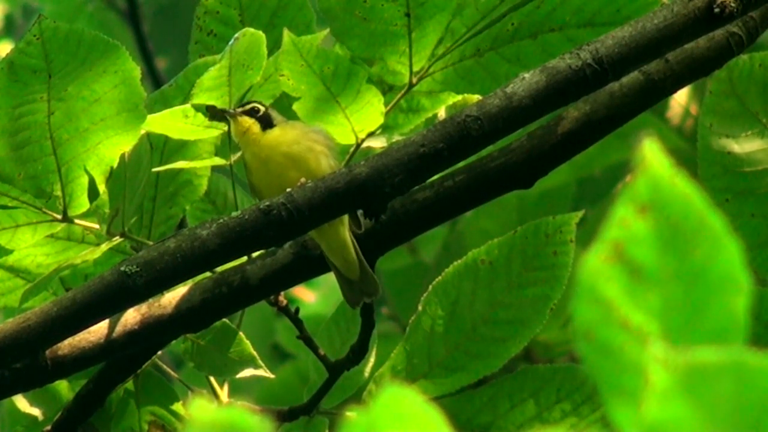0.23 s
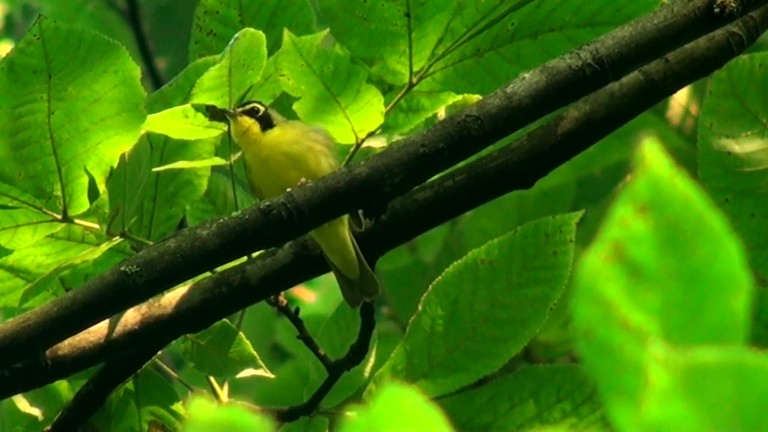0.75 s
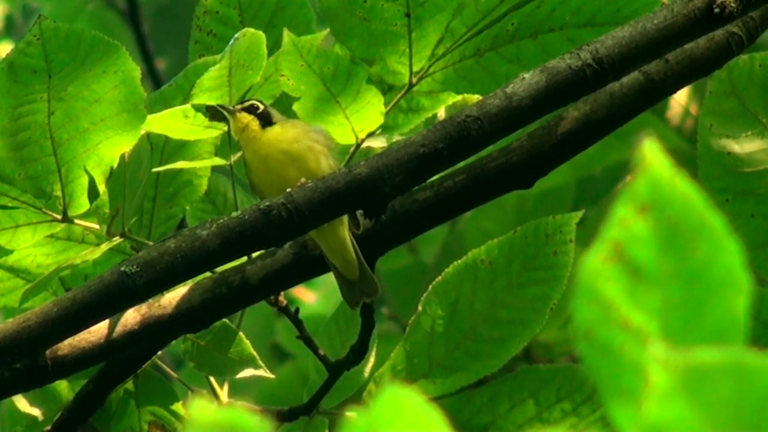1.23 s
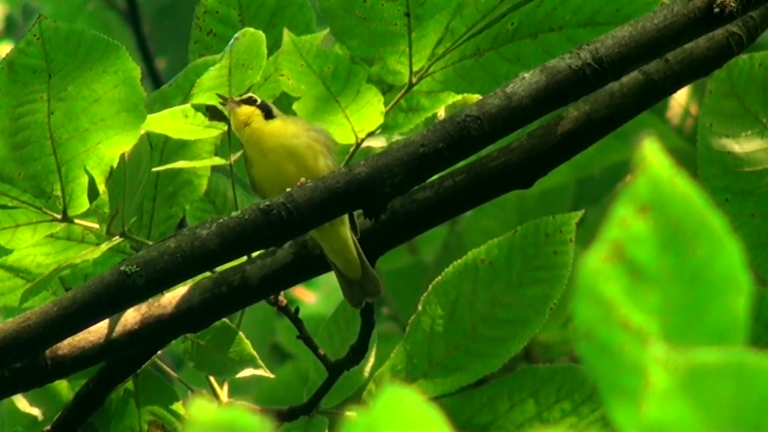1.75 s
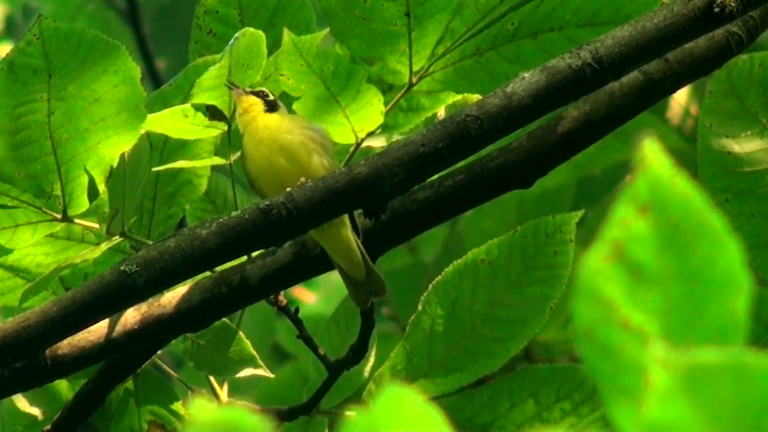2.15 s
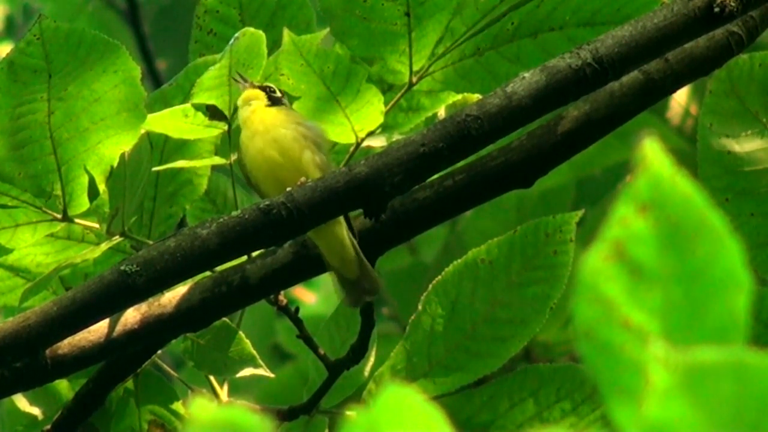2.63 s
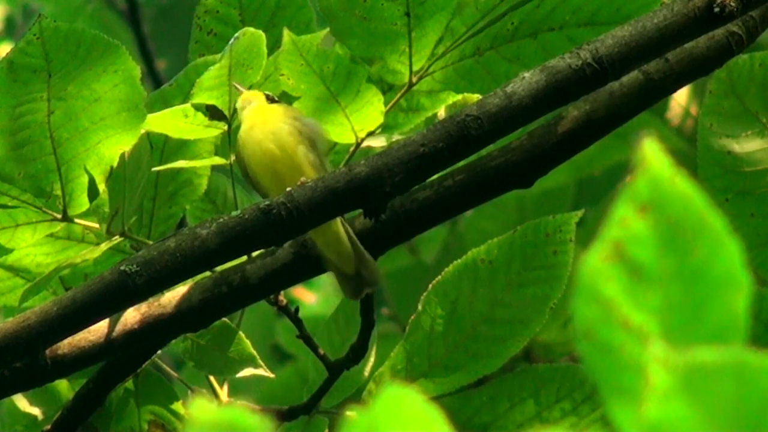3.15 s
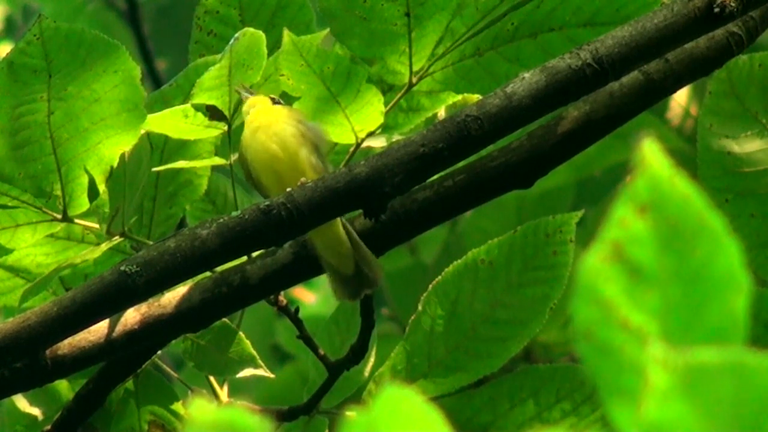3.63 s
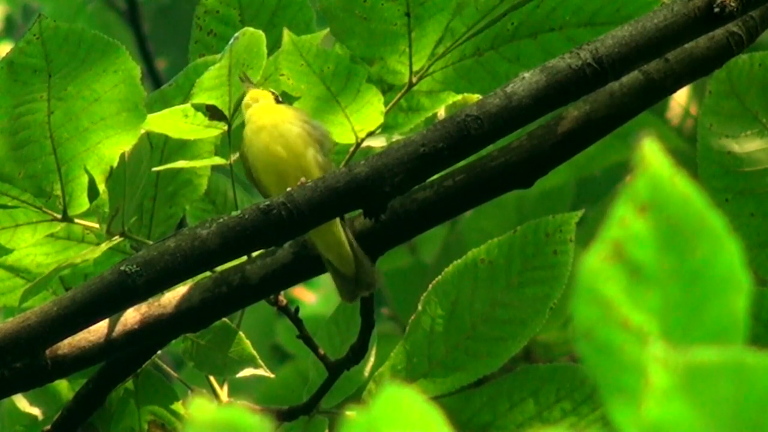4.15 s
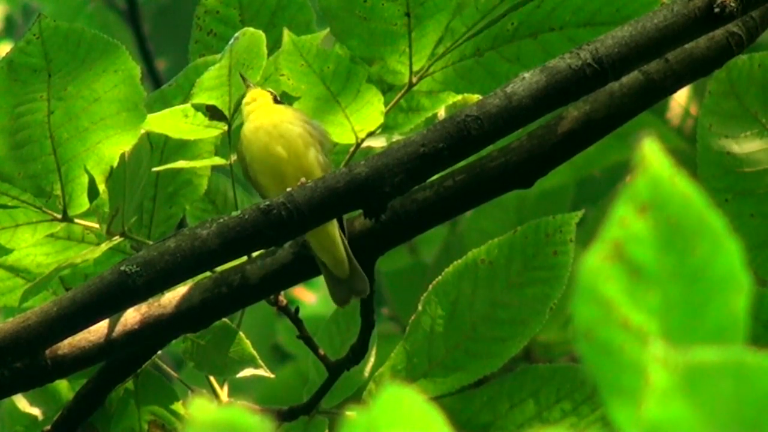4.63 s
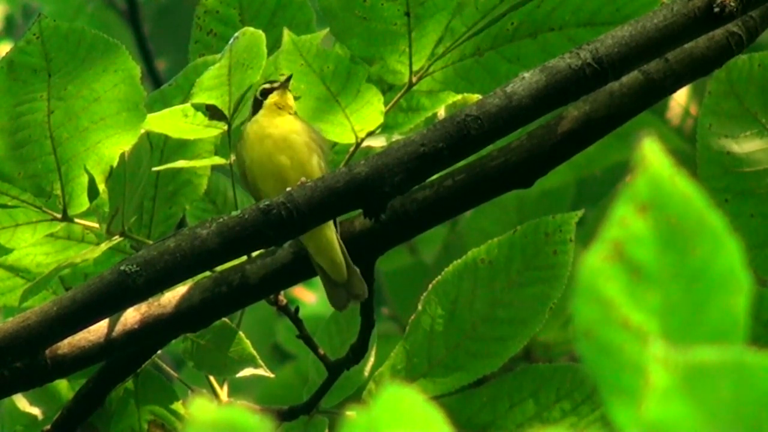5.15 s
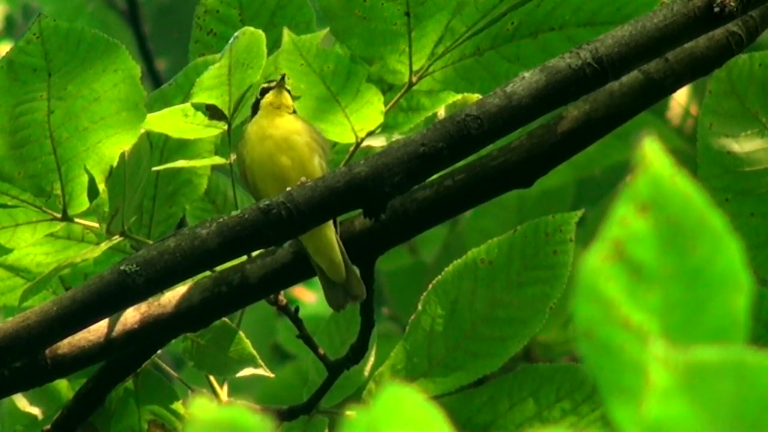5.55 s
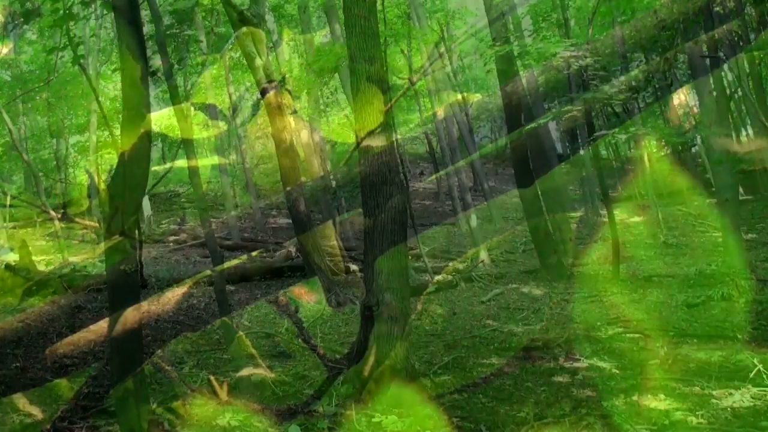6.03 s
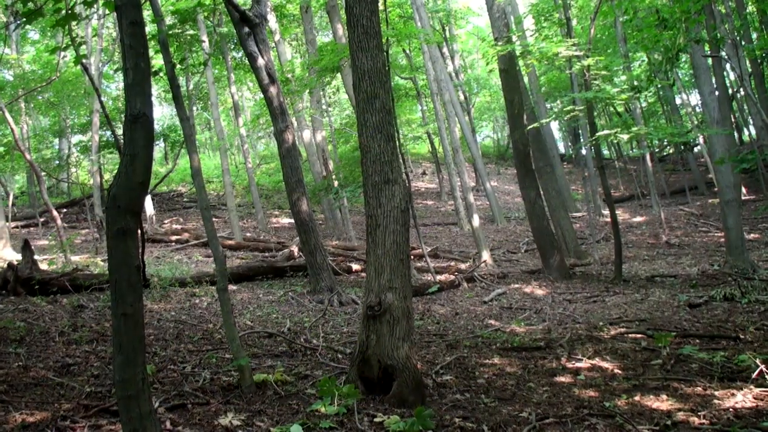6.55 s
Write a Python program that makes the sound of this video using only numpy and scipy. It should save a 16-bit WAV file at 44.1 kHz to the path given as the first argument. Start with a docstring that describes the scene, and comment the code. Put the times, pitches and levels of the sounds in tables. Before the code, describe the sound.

A low, soft woodland hush runs throughout. For the first 1.7 seconds only distant birds are heard: very thin high whistles, a sharp chip, small gliding notes and, at 1.5, a faint nasal jay-like call ending in a quick rattle. At about 1.75 and 2.1 a close warbler gives two quick, soft, high flourishes, the second louder. From 2.35 to 4.3 it rolls through nine loud phrases, nearly five a second, each two falling hooks and a rising slur that snaps upward, growing piercing and slightly clipped, ringing off leaves and trunks. A dry twig tick and another jay call near 3.0 are mostly covered. After the song stops, a distant second songbird repeats a low warble, lisp, down-slur and up-hook from 4.5 to about 5.8, with the jay again at 4.9. Chips, low pips and a few stray whistles follow, thinning to echoing quiet by 6.8.

```python
"""Warbler in a leafy wood

A warbler sings close by: soft high opening notes, then nine rolling phrases of two falling hooks and a rising slur,
loud enough to clip. Its notes are gliding tones with faint overtones, smeared by echoes off trunks and leaves.
Far off a jay-like bird calls with a rich nasal tone, a second songbird answers, and others chip and whistle thinly,
all as tones with much echo, the jay more direct. Beneath lies the hush of the wood, filtered noise; one twig ticks.
"""
import sys
import numpy as np
from scipy import signal
from scipy.fft import rfft, irfft, next_fast_len
from scipy.io import wavfile
from scipy.ndimage import uniform_filter1d

SR = 44100
rng = np.random.default_rng(int(sys.argv[2]) if len(sys.argv) > 2 else 0)


def inscribe(sig):
    """Save sig as 16-bit PCM at rate SR to the path in sys.argv[1].

    A 1-D sig is mono; a 2-D sig holds one channel per row.
    Samples are clipped to [-1, 1] before scaling.
    """
    pcm = np.round(np.clip(np.atleast_2d(sig).T, -1, 1) * 32767)
    wavfile.write(sys.argv[1], SR, pcm.astype(np.int16))


N = 298998


def amp(db):
    """Linear gain of a level in dB."""
    return 10 ** (np.asarray(db) / 20)


def along(points, hz):
    """Interpolate (frequency [Hz], value) points on a log frequency axis."""
    point_hz, values = np.transpose(points)
    return np.interp(np.log(hz + 1), np.log(point_hz + 1), values)


def filtered(x, response):
    """Shape the spectrum of x with a response of frequency."""
    size = next_fast_len(N + 8192)
    spectrum = rfft(x, size) * response(np.fft.rfftfreq(size, 1 / SR))
    return irfft(spectrum, size)[..., :N]


def add(track, s, sound):
    """Mix a sound into a track from time s."""
    part = track[round(s * SR):][:len(sound)]
    part += sound[:len(part)]


def tone(times, hz, db, overtones=()):
    """A syrinx tone gliding along pitch and level points, corners rounded over 2 ms."""
    times = np.maximum.accumulate(times)
    t = np.arange(times[0], times[-1], 1 / SR)
    pitch = uniform_filter1d(np.interp(t, times, hz), size=88, mode="nearest")
    level = uniform_filter1d(np.interp(t, times, db), size=88, mode="nearest")
    phase = 2 * np.pi * np.cumsum(pitch) / SR
    partials = sum(amp(gain_db) * np.sin(multiple * phase) for multiple, gain_db in overtones)
    return amp(level) * (np.sin(phase) + partials)


def fluttering(times, hz, db, depth_db, depth_hz, per_s):
    """Pitch and level points with uneven flutter laid over them, per_s random points a second."""
    t = np.union1d(times, np.arange(times[0], times[-1], 1 / per_s))
    pitch_wobble, level_wobble = rng.standard_normal((2, 400))[:, :len(t)]
    pitch = np.interp(t, times, hz) + depth_hz * pitch_wobble
    level = np.interp(t, times, db) + depth_db * level_wobble
    return t, pitch, level


def whistle(length, start_hz, middle_hz, end_hz, db, swell_db=0):
    """A pure gliding note that softens at its very end; a swell tilts its level from start to end."""
    u = np.array([0, .15, .5, .85, 1])
    hz = np.interp(u, [0, .5, 1], [start_hz, middle_hz, end_hz])
    contour_db = np.array([2.5, 0.5, 2, 2.5, -10.5])
    return tone(length * u, hz, db + swell_db * (u - .5) + contour_db)


def scatter(t60s, rise):
    """An echo tail of energy 1: noise that builds up while each frequency dies at its own speed."""
    hz, t, bands = signal.stft(rng.standard_normal(SR), SR, nperseg=256)
    decay = amp(-60 * t / along(t60s, hz)[:, None])
    tail = signal.istft(bands * decay, SR, nperseg=256)[1]
    build_up = 1 - np.exp(-np.arange(len(tail)) / SR / max(rise, 1e-4))
    tail = tail * build_up
    return tail / np.linalg.norm(tail)


# Decay of the echo from nearby leaves and trunks: (frequency [Hz], t60 [s])
NEAR_WOOD = [(2000, 0.23), (3500, 0.45), (5000, 0.29), (9000, 1)]
# Decay of the echo from deep in the wood: (frequency [Hz], t60 [s])
DEEP_WOOD = [(1500, 0.91), (3500, 0.84), (5000, 1), (9000, 0.4)]


def echoes(near_db, deep_db, rise):
    """Near leaves answer quickly (rise in s); the deep wood builds up eight times slower."""
    return amp(near_db) * scatter(NEAR_WOOD, rise) + amp(deep_db) * scatter(DEEP_WOOD, 8 * rise)


def leaves(spread):
    """Foliage near a bird: a dense cluster of echoes within 23 ms, thinning past spread [s], energy 1."""
    t = np.arange(1024) / SR
    cluster = rng.standard_normal(len(t)) * amp(-3 * t / spread) / (1 + (t / spread) ** 12)
    return cluster / np.linalg.norm(cluster)


def far(dry, direct_db, deep_db):
    """Distant voices reach us with much echo; each quarter-second piece gets a freshly drawn echo tail."""
    out, step = amp(direct_db) * dry, SR // 4
    for k in range(0, N, step):
        path = echoes(near_db=2.0, deep_db=deep_db, rise=0.0075)
        add(path, 0, amp(4) * leaves(spread=0.03))
        add(out, k / SR, signal.fftconvolve(dry[k:k + step], path))
    return out


# Tone colour of the hush: (frequency [Hz], relative spectral level [dB])
HUSH = [(15, -64), (30, -35.5), (60, -11), (120, -9.5), (450, -8), (700, -12.5), (1500, -17), (3000, -20),
        (6000, -24), (10000, -27.5), (15700, -28.5)]
# Overall level of the background hush: (time [s], RMS level [dB])
HUSH_LEVEL = [(0.0, -46), (1.5, -46.5), (2.4, -44.5), (3.4, -42.2), (4.3, -42), (5.7, -42.5), (6.78, -46)]


def hush():
    """Far leaves and microphone hiss: noise coloured by frequency, set to a level curve."""
    noise = filtered(rng.standard_normal(N), lambda hz: amp(along(HUSH, hz)))
    s, db = np.transpose(HUSH_LEVEL)
    return amp(np.interp(np.arange(N) / SR, s, db)) * noise / np.std(noise)


# A twig ticks: (time [s], starting level [dB])
TICKS = [(3.011, -12)]


def twig():
    """A dry tick: a 1300 Hz burst that falls 60 dB in 2.2 ms, too short to ring."""
    out, t = np.zeros(N), np.arange(400) / SR
    for s, db in TICKS:
        add(out, s, amp(db - 60 * t / 0.0022) * np.sin(2 * np.pi * 1300 * t))
    return out


# Very high thin whistles, before distance: (time [s], length [s], pitch [Hz], level [dB])
THIN = [(0.31, .23, 8200, -64), (0.438, .17, 9380, -69), (0.443, .16, 10000, -74), (.6, 0.07, 9150, -65.5),
        (.62, .16, 9930, -74), (.85, .15, 9030, -68), (0.867, .1, 9800, -65.5), (1.941, 0.36, 8220, -65.5),
        (2.09, 0.27, 9110, -63), (2.129, 0.22, 9800, -67), (2.3, 0.32, 8000, -69.5),
        (2.787, 0.61, 9040, -66.5), (3.0, .25, 9900, -68.5), (3.34, .12, 10180, -64),
        (3.424, .3, 9000, -62), (3.47, .3, 8850, -65), (3.553, 0.23, 8290, -60.5), (4.863, .26, 9200, -65),
        (4.89, .24, 10000, -68), (4.943, .23, 8330, -60), (5.78, .12, 8840, -72), (6.437, .12, 8960, -66.5)]
THIN_FLUTTER_DB, THIN_FLUTTER_HZ = 3, 50


def thin():
    """Very high held tones that waver unevenly in level and pitch."""
    out = np.zeros(N)
    for s, length, hz, db in THIN:
        times = length * np.array([0, .15, .85, 1])
        level = db + np.array([-9, 3, 3, -9])
        points = fluttering(times, np.full(4, hz), level, THIN_FLUTTER_DB, THIN_FLUTTER_HZ, per_s=45)
        add(out, s, tone(*points))
    return out


PIP_S, PIP_HZ = 0.036, 2170
# Short low pips, before distance: (time [s], level [dB])
PIPS = [(1.05, -60), (5.72, -56), (5.9, -59), (6.125, -56), (6.295, -60), (6.515, -74)]


def pips():
    """Short low pure notes, all at one pitch."""
    out = np.zeros(N)
    for s, db in PIPS:
        add(out, s, whistle(PIP_S, PIP_HZ, PIP_HZ, PIP_HZ, db))
    return out


# Single far notes, before distance:
# (time [s], length [s], start pitch [Hz], middle pitch [Hz], end pitch [Hz], level [dB])
WHISTLES = [(.855, 0.2, 2285, 2523, 2630, -59.5), (.975, 0.034, 2784, 2770, 2810, -59.5),
            (.978, 0.095, 7800, 7770, 6800, -63), (1.146, .04, 3300, 3270, 3120, -62),
            (1.22, 0.2, 2086, 2450, 2670, -56), (1.361, 0.041, 2730, 3027, 3060, -49),
            (1.441, 0.13, 2130, 2360, 2170, -53.5), (1.666, .018, 4430, 5370, 5350, -47),
            (1.666, 0.012, 2380, 2670, 2580, -46), (1.69, 0.11, 2315, 2430, 2370, -58),
            (1.803, 0.071, 2006, 2340, 2285, -53.5), (1.935, 0.059, 3200, 2590, 2205, -51.5),
            (2.036, 0.018, 2560, 2540, 2617, -43.5), (4.695, 0.11, 3180, 2880, 2750, -47.5),
            (5.98, 0.022, 4000, 3470, 2950, -46), (5.989, .031, 7900, 7260, 6970, -58),
            (6.15, 0.72, 856, 879, 853, -68.5), (6.167, 0.037, 2510, 2960, 3530, -44),
            (6.217, 0.037, 3650, 3750, 3850, -56.5), (6.379, 0.053, 2500, 2575, 2830, -58)]


def single_notes():
    """Scattered pure notes, each with its own glide."""
    out = np.zeros(N)
    for s, *note in WHISTLES:
        add(out, s, whistle(*note))
    return out


# Contour of a chip: (time from its start [s], pitch [Hz], relative level [dB])
CHIP = [(0, 5330, -39.5), (.002, 5400, 8.5), (.005, 6560, 10), (.010, 7500, 11), (.016, 7700, -35)]
# Chips, before distance: (time [s], level the contour is added to [dB])
CHIPS = [(0.447, -59), (2.295, -55), (3.188, -57), (4.096, -48), (5.562, -48.5)]


def chips():
    """Sharp chips: a tone sweeping steeply upwards within milliseconds."""
    out = np.zeros(N)
    for s, db in CHIPS:
        add(out, s, amp(db) * tone(*np.transpose(CHIP)))
    return out


# Contour of the low warble: (time from its start [s], pitch [Hz], relative level [dB])
WARBLE = [(0, 2350, -9), (.015, 2430, -7.5), (.05, 2560, -10.5), (.065, 2690, -9.2), (.1, 2680, -9),
          (0.128, 2690, -11.5), (.17, 2600, -13.5), (.2, 2430, -29), (.215, 2410, -15)]
# Warbles, before distance: (time [s], level the contour is added to [dB])
WARBLES = [(4.511, -41), (4.839, -36.5), (5.166, -37), (5.495, -35.5), (5.814, -37.5)]
FLUTTER_DB, FLUTTER_HZ = 5.5, 60.4


def warble():
    """A low tone, uneven in level and pitch, that leads each answering phrase.

    It also leads a fifth, shortened phrase whose other notes are among the single notes.
    """
    out = np.zeros(N)
    for s, db in WARBLES:
        points = fluttering(*np.transpose(WARBLE), FLUTTER_DB, FLUTTER_HZ, per_s=120)
        add(out, s, amp(db) * tone(*points))
    return out


# One answering phrase, lisp, down-slur, up-hook: (time from its start [s], length [s],
# start pitch [Hz], middle pitch [Hz], end pitch [Hz], relative level [dB], swell [dB])
ANSWER = [(-.024, .028, 7220, 6960, 6575, -22, 11), (0.001, .052, 5880, 4820, 3880, -13, 15),
          (0.101, .033, 3065, 3398, 3570, -8.5, -6)]
# Answering phrases, before distance: (time [s], phrase level [dB])
ANSWERS = [(4.647, -32), (4.968, -29.5), (5.297, -30), (5.627, -30)]


def answering_bird():
    """A second songbird repeats a phrase of three gliding pure notes."""
    out = np.zeros(N)
    for start, phrase_db in ANSWERS:
        for s, *note in ANSWER:
            add(out, start + s, amp(phrase_db) * whistle(*note))
    return out


# Overtones of the jay: (multiple of the strong second partial [ratio], relative level [dB])
JAY_OVERTONES = [(.5, -20), (1.5, -24), (2, -15), (2.5, -17), (3, -21)]
# Jay calls, before distance: (time [s], call level [dB])
JAYS = [(1.538, -47), (3.073, -41.5), (4.881, -46)]
# Pitches are of the strong second partial, levels relative to the call, before flutter
JAY_ATTACK_S, JAY_HOLD_S, JAY_START_HZ, JAY_END_HZ, JAY_FADE_DB = .025, .156, 1788, 1755, -2.5
PULSE_S, PULSE_TOP_HZ, PULSE_BOTTOM_HZ = .021, 1720, 1526
PULSE_DB, PULSE_LOSS_DB, PULSE_GAP_DB = 1.5, 1.5, -34.5  # first pulse, loss per pulse, dip between
JAY_FLUTTER_DB, JAY_FLUTTER_HZ = 3.5, 13.5


def jay():
    """A nasal tone with several partials, held and then broken into quick falling pulses."""
    held = JAY_ATTACK_S + JAY_HOLD_S
    call = [(0, JAY_END_HZ, PULSE_GAP_DB),
            (JAY_ATTACK_S, JAY_START_HZ, 0),
            (held, JAY_END_HZ, JAY_FADE_DB)]
    for k in range(4):
        s, db = held + k * PULSE_S, PULSE_DB - k * PULSE_LOSS_DB
        call += [(s + 0.17 * PULSE_S, PULSE_TOP_HZ, db + PULSE_GAP_DB),
                 (s + 0.49 * PULSE_S, PULSE_TOP_HZ, db),
                 (s + PULSE_S, PULSE_BOTTOM_HZ, db)]
    call.append((held + 3.5 * PULSE_S, PULSE_BOTTOM_HZ, db + PULSE_GAP_DB))
    out = np.zeros(N)
    for s, db in JAYS:
        points = fluttering(*np.transpose(call), JAY_FLUTTER_DB, JAY_FLUTTER_HZ, per_s=40)
        add(out, s, amp(db) * tone(*points, JAY_OVERTONES))
    return out


# A hook flicks up, turns and slides down:
# (time from the top [fall lengths], share of the pitch drop [ratio], relative level [dB])
HOOK = [(-.55, 0.906, -23.5), (-.2, 0.151, -8.5), (-.08, 0.025, 1), (.13, 0.049, -2.9), (.25, 0.26, -4.5),
        (.4, 0.346, -3.5), (.65, .66, -7.5), (.92, 0.97, -11), (1.1, 1.03, -30)]
# The hook of the opening notes, same columns and units
OPENING_HOOK = [(-.4, 0.81, -29), (-.2, 0.49, -11), (-.05, 0.018, -8), (.1, 0.0071, -9), (.4, 0.29, 3.5),
                (.7, .7, -1), (.95, 0.98, -3.5), (1.1, 0.99, -55)]
# A short rounded note, same columns and units
ARCH = [(-1.2, 0.68, -30), (-.5, .8, 0), (-0.04, 0.19, -1.5), (0.61, 0.44, -7.5), (0.94, 0.62, 3),
        (1.06, 1.2, -32)]
# One opening phrase, arch, hook, hook, arch:
# (time from its start [s], top pitch [Hz], bottom pitch [Hz], fall length [s], relative level [dB])
OPENING = [(0, 3110, 2770, 0.012, -3.5), (.037, 4440, 3260, 0.029, -4), (.084, 4660, 3240, .028, -0.3),
           (.134, 5046, 4606, .016, -1)]
# Opening phrases: (time [s], shift of the first hook's top [Hz], phrase level [dB])
OPENINGS = [(1.751, -270, -24.5), (2.087, 1, -17)]
# The slur climbs, lingers, then snaps up, before stretch, hold and lift:
# (time from the top [s], pitch [Hz], relative level [dB], share of the extra hold [ratio])
SLUR = [(-.048, 3162, -21, 0), (-.043, 3357, -9, 0), (-.029, 3585, -8.5, 0), (-.023, 3596, 0.9, 0.011),
        (-.017, 3662, -3.4, 0), (-.011, 3730, -6.5, 0), (-.004, 4060, -1, 0), (.0005, 4198, -1.6, .5),
        (.003, 4134, -22, 1), (.008, 4060, -37, 0.065)]
# Rolling phrases: (time of the first hook's top [s], its pitch [Hz], fall length of the hooks [s],
# hook level [dB], time of the slur's top [s], slur stretch [ratio], extra hold [s], slur level [dB])
PHRASES = [(2.347, 3190, 0.029, -16.5, 2.472, 1.1, .001, -8),
           (2.563, 3390, 0.025, -12, 2.691, .91, 0.0008, -5),
           (2.778, 3397, 0.025, -10, 2.903, 1.1, 0.0016, -5),
           (3.001, 3386, 0.023, -8.5, 3.13, 1.1, 0.00043, -2.5),
           (3.216, 3375, .026, -8.5, 3.349, 1.08, 0.00077, -3),
           (3.437, 3344, 0.025, -7.5, 3.565, .9, 0.0024, -2.5),
           (3.659, 3338, 0.024, -8, 3.786, 1.01, 0.011, -2),
           (3.887, 3347, 0.027, -8, 4.015, 0.86, 0.0016, -3),
           (4.149, 3358, 0.025, -8.5, 4.276, 0.89, 0.00069, -4.5)]
HOOK_BOTTOM_HZ = 2208
HOOK_GAP_S, SECOND_DROP_HZ, SECOND_DB = .048, 40.3, 0  # the second hook against the first
LIFT_HZ_PER_S = 18000  # a slur that is held longer climbs higher
# Faint overtones of the song: (multiple of the pitch [ratio], relative level [dB])
WARBLER_OVERTONES = [(2, -42.5), (3, -57), (4, -45.5)]
# Firm echoes near the perch, before their variation: (delay [s], level [dB])
BRANCHES = [(.0032, -9), (.0062, -9.5), (.0082, -8.5), (.0118, -15.5), (.0152, -17), (.031, -10.5)]
STEADY = 0.82  # constant part of each echo weight, against a random part of deviation 1


def shaped(shape, s, top, bottom, fall, db):
    """Fit a note shape to its time, pitch range, fall length and level."""
    u, drop, level = np.transpose(shape)
    return s + fall * u, top - drop * (top - bottom), db + level


def song_notes():
    """The warbler's pitch and level contours: opening arches and hooks, then rolling phrases."""
    notes = []
    for start, shift_hz, phrase_db in OPENINGS:
        for k, (s, top, bottom, fall, db) in enumerate(OPENING):
            shape = OPENING_HOOK if k in (1, 2) else ARCH
            notes.append(shaped(shape, start + s, top + shift_hz * (k == 1), bottom, fall, phrase_db + db))
    u, hz, level, extra = np.transpose(SLUR)
    for s, top, fall, db, slur_s, stretch, hold, slur_db in PHRASES:
        first = shaped(HOOK, s, top, HOOK_BOTTOM_HZ, fall, db)
        second = shaped(HOOK, s + HOOK_GAP_S, top - SECOND_DROP_HZ, HOOK_BOTTOM_HZ, fall, db + SECOND_DB)
        slur_times = slur_s + stretch * u + hold * extra
        slur_hz = hz + LIFT_HZ_PER_S * hold * (extra > 0)
        notes += [first, second, (slur_times, slur_hz, slur_db + level)]
    return notes


def warbler():
    """Notes arrive directly and by branches, leaves and wood; each gets its own random mix of shared tails."""
    song = np.zeros(N)
    tails = [echoes(near_db=0.65, deep_db=-14.5, rise=.01) for _ in range(8)]
    for times, hz, db in song_notes():
        weights = rng.standard_normal(len(tails)) + STEADY
        path = weights @ tails / np.linalg.norm(weights)
        add(path, 0, amp(-9) * leaves(spread=.012))
        path[0] = 1  # direct sound
        for delay, echo_db in BRANCHES:
            path[round(delay * SR)] += amp(echo_db + rng.normal(0, 3.2))
        note = tone(times, hz, db, WARBLER_OVERTONES)
        add(song, times[0], signal.fftconvolve(note, path))
    return song


def scene():
    """Close warbler over far birds, a twig and the hush of the wood."""
    small_birds = pips() + single_notes() + answering_bird() + chips() + warble() + thin()
    others = far(small_birds, direct_db=-5, deep_db=2.5)
    far_jay = far(jay(), direct_db=7.5, deep_db=-2.5)
    return (warbler() + others + far_jay + twig() + hush())[None]


TOP_HZ = 15750  # band limit


def record(dry):
    """The loudest notes are cut flat at full scale; nothing is kept above the band limit."""
    return filtered(np.clip(dry, -1, 1), lambda hz: hz < TOP_HZ)


dry = scene()
out = record(dry)
inscribe(out)
```